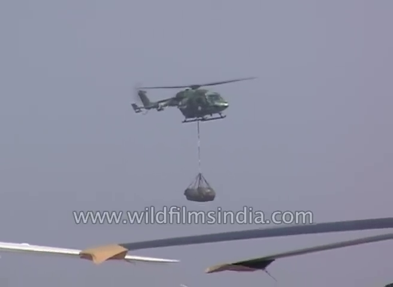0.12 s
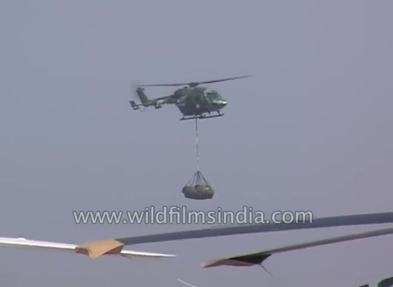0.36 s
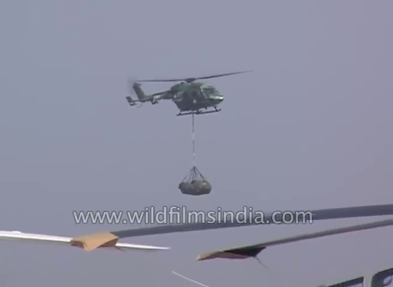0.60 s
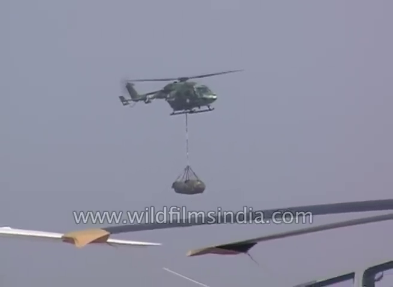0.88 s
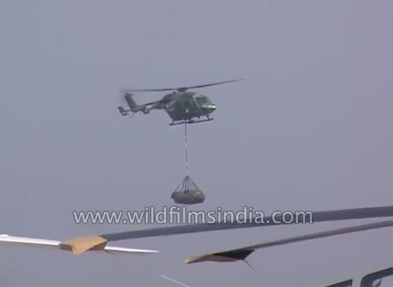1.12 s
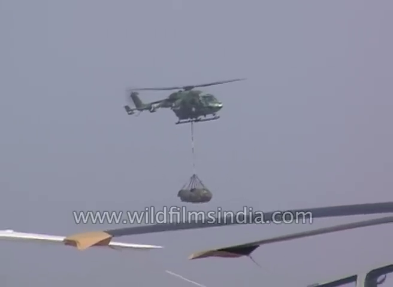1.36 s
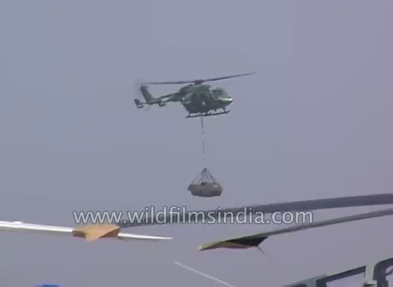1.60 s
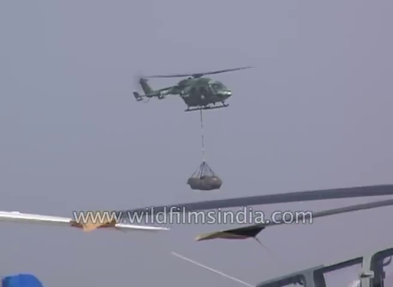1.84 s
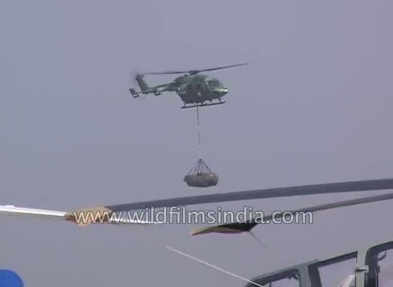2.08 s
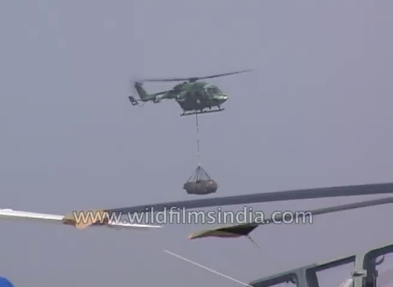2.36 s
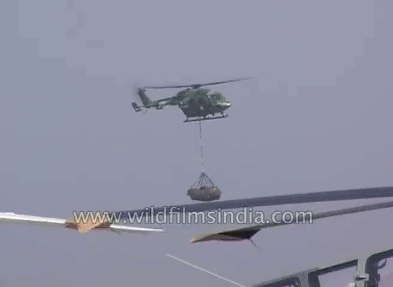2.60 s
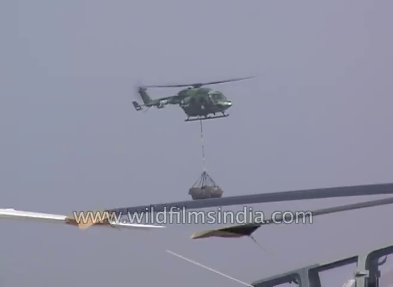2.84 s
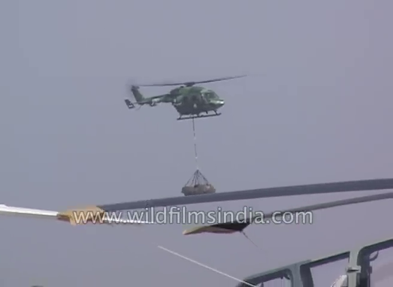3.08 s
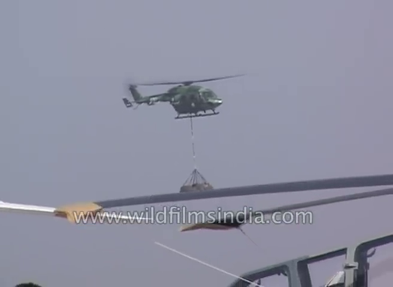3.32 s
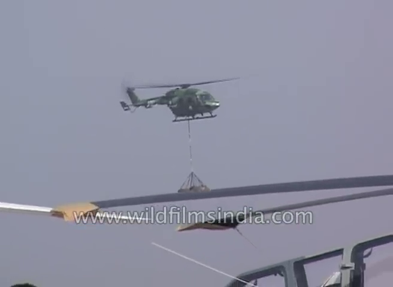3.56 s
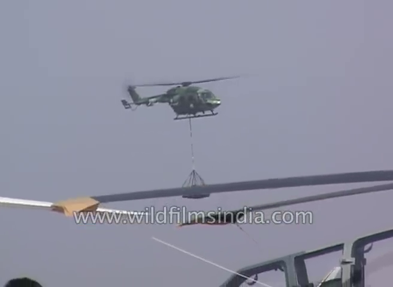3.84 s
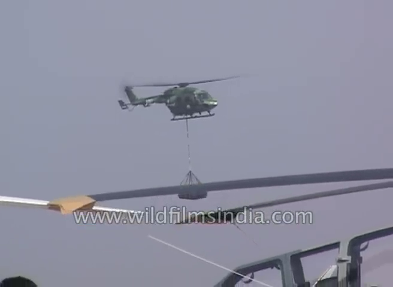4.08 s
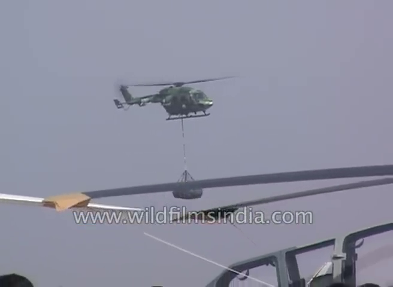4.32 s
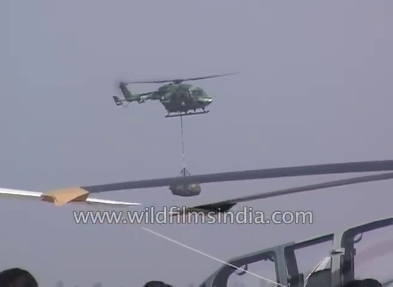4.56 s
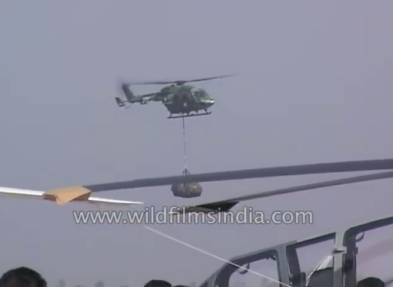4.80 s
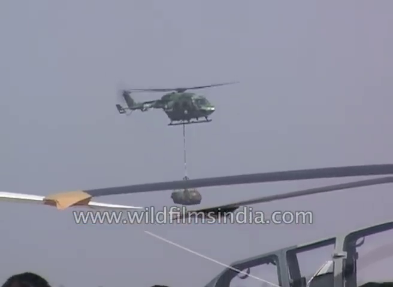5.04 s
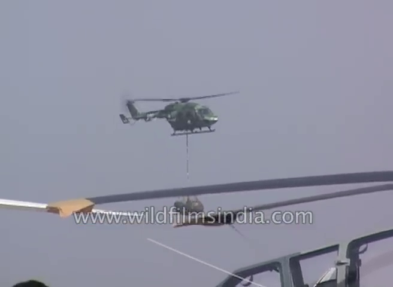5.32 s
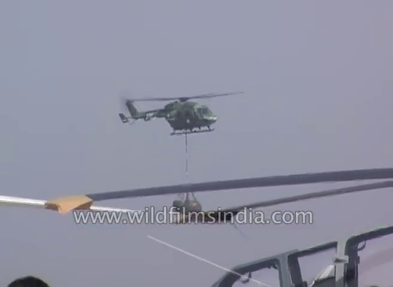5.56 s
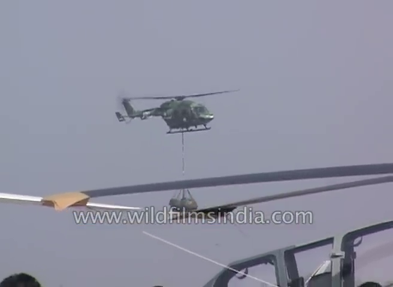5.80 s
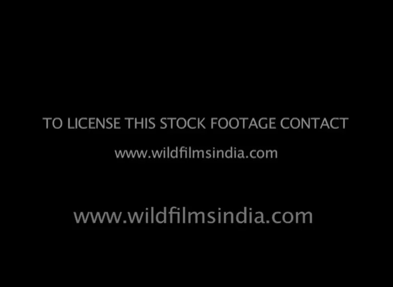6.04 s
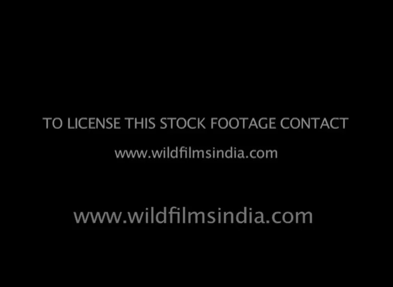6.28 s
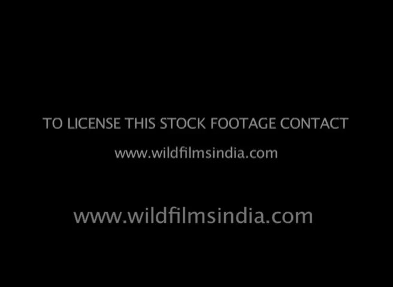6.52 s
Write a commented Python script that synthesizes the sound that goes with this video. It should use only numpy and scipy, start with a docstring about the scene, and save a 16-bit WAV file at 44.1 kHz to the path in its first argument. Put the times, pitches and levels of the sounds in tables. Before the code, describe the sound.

A helicopter hovers outdoors at some distance. Its blades slap about twenty-one times a second, a fast low flutter with small dry cracks, over rumbling wash, airy swish and a steady tail-rotor hum. Slaps are strongest from one to two and a half seconds, then blur and soften. A thin turbine whine and camcorder hiss sit behind. Everything fades to silence by six seconds.

```python
"""A helicopter's four-blade rotor slaps about 21 times a second: each pass is a thud or puff with a crack.
Shaped noise makes rotor wash, blade swish and exhaust hiss; wavering harmonics make the tail rotor hum.
A narrow fluttering band is the turbine whine. The tape camcorder adds hiss, a picture-line whistle and
the buzz of its drum. All of it fades to silence near the end."""
import sys
import numpy as np
from scipy import signal
from scipy.fft import rfft, irfft
from scipy.io import wavfile
from scipy.ndimage import uniform_filter1d

SR = 44100
rng = np.random.default_rng(int(sys.argv[2]) if len(sys.argv) > 2 else 0)


def store_wav(level_fs):
    """Save 16-bit WAV to argv[1]."""
    pcm = np.round(np.clip(np.atleast_2d(level_fs), -1, 1) * 32767)
    wavfile.write(sys.argv[1], SR, pcm.T.astype(np.int16))


def level_to_linear(level):
    """Convert decibel levels to linear amplitude factors, elementwise."""
    exponent = np.asarray(level, float) / 20
    return 10 ** exponent


N = 293706
BLADE_HZ, TAIL_HZ = 20.95, 102.97


def evened(x):
    """Scales to rms 1."""
    return x / np.sqrt(np.mean(x ** 2) + 1e-20)


def read_spectrum(points, hz):
    """Reads a spectrum table on a log-frequency axis."""
    point_hz, db = np.transpose(points)
    return np.interp(np.log(hz + 1), np.log(point_hz + 1), db)


def curves(rows, t):
    """Returns the columns of a time table at times t."""
    row_s, *columns = np.transpose(rows)
    return [np.interp(t, row_s, column) for column in columns]


def drift(hz, size):
    """Slow chance up to about hz, rms about 1; one row for each of size."""
    coarse = N // 64 + 1
    z = rfft(rng.standard_normal((size, coarse)))
    z *= np.exp(-(np.fft.rfftfreq(coarse, 64 / SR) / hz) ** 2)
    slow = irfft(z, coarse)
    slow = slow / slow.std(1, keepdims=True)
    steps = np.repeat(slow, 64, 1)[:, :N]
    return uniform_filter1d(steps, size=64)


def gusty(spectrum, patchy_db):
    """Rms-1 noise whose spectrum flickers in patches, as air eddies cross the sound path."""
    frames, hz = N // 256 + 5, np.fft.rfftfreq(1024, 1 / SR)
    real, imag, patches = rng.standard_normal((frames, 513, 3)).T
    patches = uniform_filter1d(patches, size=8, axis=0)
    patches = evened(uniform_filter1d(patches, size=20, axis=1))
    level_db = read_spectrum(spectrum, hz)[:, None] + patchy_db * patches
    z = (real + 1j * imag) * level_to_linear(level_db)
    return evened(signal.istft(z, nperseg=1024, noverlap=768)[1][:N])


def gate(s, ms):
    """Bell-shaped gate around time 0."""
    return np.exp(-(1000 * s / ms) ** 2 / 4)


def unit_pass(passes):
    """Scales each blade pass to mean power 1 over one blade period."""
    return passes / np.sqrt((passes ** 2).sum(1, keepdims=True) * BLADE_HZ / SR)


def thud(u, lag_s, hz, turn):
    """Short wave packet plus a low boom that lingers; deeper thuds boom more."""
    cycles, locked_hz, turn_spread_rad = 0.71, 243, .3
    boom_ms, boom_hz = 3.8, 238.0
    boom_db = np.minimum(-9 - 0.21 * (hz - 300), 0)
    # the wave keeps step with the rotor
    phase = 2 * np.pi * locked_hz * lag_s - .6 + turn_spread_rad * turn
    packet = np.exp(-(u * hz / cycles) ** 2) * np.cos(2 * np.pi * hz * u + phase)
    after = np.maximum(1000 * u / boom_ms, 0)
    swell = np.e * after * np.exp(-after)
    boom = level_to_linear(boom_db) * swell * np.cos(2 * np.pi * boom_hz * u + phase)
    return unit_pass(packet + boom)


# Low noise of the rotor's air, relative spectrum; airflow() plays it too.
# Each row: frequency in Hz, spectral level in dB per Hz.
WASH_SPECTRUM = [(13, -49), (22, -37.5), (81, -7), (160, -5.5), (221, 3), (296, -15.5), (375, 1), (413, -4),
                 (554, -14.5), (620, -26.5), (810, -44), (1360, -120)]


def puff(u, in_step, smear_ms, hz):
    """Burst of wash noise leaning to the thud's pitch; each blade finds air like the last one did."""
    alike, width_hz, lift_db = 0.91, 76, 6
    fresh = gusty(WASH_SPECTRUM, patchy_db=0)[:len(u) * 2048].reshape(-1, 2048)
    eddies = signal.lfilter([1], [1, -alike], fresh, axis=0)
    burst = gate(u, smear_ms) * np.take_along_axis(eddies, (in_step + 1024) % 2048, 1)
    off_pitch = (np.fft.rfftfreq(4096, 1 / SR) - hz) / width_hz
    lift = level_to_linear(lift_db * np.exp(-off_pitch ** 2))
    return unit_pass(irfft(rfft(burst) * lift))


# Blade swish, relative spectrum with dips from the ground echo; airflow() plays it too.
# Each row: frequency in Hz, spectral level in dB per Hz.
SWISH_SPECTRUM = [(330, -19), (560, -7), (676, 7), (763, -6), (833, 4.5), (947, -7), (1030, -1),
                  (1260, -0.5), (1400, -5.5), (1680, -5.5), (2240, -15.5), (2580, -29), (2800, -39),
                  (3640, -71), (6160, -120)]
# Treble bite of the crack, relative spectrum. Each row: frequency in Hz, spectral level in dB per Hz.
BITE_SPECTRUM = [(2000, -30), (2500, 7), (3200, 2), (3900, -6), (4600, -5.5), (5400, -25.5), (7000, -52.5)]


def crack(u, index, smear_ms, keen):
    """Gated swish and treble noise broken into snaps; it leads the thud and dulls as the slap smears."""
    lead_ms, rise_share, ragged_db, bite_uneven_db = 1.3, .4, 2.5, 3.5
    v = u + lead_ms / 1000
    snaps = gate(v, smear_ms * np.where(v < 0, rise_share, 1))  # quick to rise, slower to fall
    ragged = np.take(drift(150, size=1)[0], index, mode="wrap")
    snaps = snaps * level_to_linear(ragged_db * ragged)
    swish = unit_pass(snaps * np.take(gusty(SWISH_SPECTRUM, 0), index, mode="wrap"))
    bite = unit_pass(snaps * np.take(gusty(BITE_SPECTRUM, 0), index, mode="wrap"))
    bite_db = -17 - 2 * smear_ms + bite_uneven_db * keen
    return swish + level_to_linear(bite_db) * bite


# Mean blade slap over time, before spread from blade to blade.
# Each row: time in seconds, lag behind the steady beat in ms, thud level in dB, smear in ms,
# thud pitch in Hz, crack against the thud in dB.
SLAPS = [(0.1, 2.5, -30.5, 5.04, 346, -18.5), (0.33, 1.5, -40, 4.4, 330, -9.5),
         (0.55, 0.5, -32, 2.6, 287, -12.5), (0.9, 1.5, -31.5, 2.54, 293, -17),
         (1.1, 2, -25.5, 1.88, 321, -21.5), (1.22, 2, -26.5, 3.2, 332, -16),
         (1.34, 2.5, -32, 2.66, 364, -17.5), (1.45, 2.5, -26, 2.75, 273, -18),
         (1.72, 2, -24, 3.1, 264, -24), (1.86, 0.5, -29, 3.6, 389, -8), (2.05, -0.4, -29, 4.3, 310, -8.5),
         (2.2, -3, -26, 2.64, 254, -16), (2.3, 2, -26, 4, 266, -13), (2.5, 1.5, -30.5, 5.5, 344, -11),
         (2.62, -5, -33.5, 7, 290, -15), (2.95, -3.5, -32.5, 4.7, 280, -16.5),
         (3.2, -5.5, -34, 5.8, 264, -10), (3.4, -7, -37.5, 7.9, 344, -14.5), (3.7, 4, -38.5, 6.2, 276, -9),
         (4.1, -4, -36.5, 4.5, 280, -10), (4.35, 0.5, -33.5, 3.8, 327, -8), (4.52, 2, -32, 1.9, 298, -13.5),
         (4.75, -.5, -35, 5.7, 300, -16), (5.05, -0.5, -34.5, 1.6, 321, -16), (5.45, -1.5, -36, 4, 308, -9),
         (5.9, 1, -37, 4.4, 285, -10.5)]


def main_rotor():
    """Each blade meets the vortex of the one before: a thud or a smeared puff, and a crack."""
    jitter_ms, thud_uneven_db, crack_uneven_db = .45, 1.0, 1
    sharp_ms, low_cut_hz = 4.0, 131
    beats = np.arange(int(6.2 * BLADE_HZ)) / BLADE_HZ
    lag_ms, thud_db, smear_ms, hz, crack_db = (c[:, None] for c in curves(SLAPS, beats))
    beats = beats[:, None]
    late, loud, bright, turn, keen = rng.standard_normal((len(beats), 5)).T[:, :, None]

    at = beats + (lag_ms + jitter_ms * late) / 1000
    index = np.round(at * SR).astype(int) + np.arange(-2048, 2048)
    u = index / SR - at  # seconds from the slap
    in_step = index - np.round(beats * SR).astype(int)

    # a sharp meeting repeats its shape, a smeared one is noise
    clean = 1 / (1 + (smear_ms / sharp_ms) ** 4)
    low = np.sqrt(clean) * thud(u, at - beats, hz, turn)
    low = low + np.sqrt(1 - clean) * puff(u, in_step, smear_ms, hz)
    high = crack(u, index, smear_ms, keen)
    passes = level_to_linear(thud_db + thud_uneven_db * loud) * low
    passes = passes + level_to_linear(thud_db + crack_db + crack_uneven_db * bright) * high

    slaps = np.bincount(index.ravel() + 4096, passes.ravel(), N + 8192)[4096:N + 4096]
    return signal.sosfilt(signal.butter(2, low_cut_hz, "high", fs=SR, output="sos"), slaps)


# Exhaust hiss, relative spectrum. Each row: frequency in Hz, spectral level in dB per Hz.
EXHAUST_SPECTRUM = [(2000, -26.5), (2500, 8.5), (2800, -2), (3100, 1.5), (3600, -1), (3950, -6),
                    (4600, 0.5), (5000, -9.5), (5600, -19.5), (6000, -11), (6500, -25), (7500, -32.5),
                    (9000, -74)]
# How well the moving air carries the steady noise, before each noise's share.
# Each row: time in seconds, gain in dB.
CARRY = [(0, 0.5), (.35, 1.5), (.7, 2.1), (1.1, 0.5), (1.5, 2), (1.7, 3.5), (2.05, 5.5), (2.45, 4),
         (2.8, 0.5), (3.2, .5), (3.5, -1), (3.78, 1.5), (4.1, 0.5), (4.4, 2), (4.9, -0.5), (5.45, 6),
         (5.9, -1)]


def airflow():
    """Rotor wash, blade swish and exhaust hiss; tail blades chop the last two, main blades the hiss."""
    throb_db, tail_chop_db = 0.4, 1.5
    t = np.arange(N) / SR
    carry_db, = curves(CARRY, t)
    wash_gust, swish_gust, hiss_gust = drift(4.4, size=3)
    # level in dB, share of the carry, random gusts in dB
    wash_db = -37.3 + .5 * carry_db + .8 * wash_gust
    swish_db = -46 + 1.49 * carry_db + 0.51 * swish_gust
    hiss_db = -62.5 + 0.49 * carry_db + 1 * hiss_gust

    throb = throb_db * np.cos(2 * np.pi * BLADE_HZ * t) ** 3
    chop_depth_db = tail_chop_db * (1 + 0.32 * drift(2, size=1)[0])
    chop = chop_depth_db * np.cos(2 * np.pi * TAIL_HZ * t + drift(0.78, size=1)[0])

    wash = level_to_linear(wash_db) * gusty(WASH_SPECTRUM, patchy_db=2.0)
    swish = level_to_linear(swish_db + chop) * gusty(SWISH_SPECTRUM, patchy_db=1.9)
    hiss = level_to_linear(hiss_db + throb + chop) * gusty(EXHAUST_SPECTRUM, patchy_db=1.0)
    return wash + swish + hiss


# Tail rotor harmonics. Each row: multiple of the tail blade rate, mean rms level in dB.
TAIL_HARMONICS = [(1, -49.5), (2, -50.5), (3, -48.5), (4, -68), (6, -69.5), (8, -69)]


def tail_rotor():
    """A hum of blade harmonics that waver in level and, together, in pitch."""
    waver_hz, waver_db = 0.304, 0.5
    phase = 2 * np.pi * np.cumsum(TAIL_HZ + waver_hz * drift(1.61, size=1)[0]) / SR
    order, db = np.transpose(TAIL_HARMONICS)[:, :, None]
    level = np.sqrt(2) * level_to_linear(db + waver_db * drift(6, size=len(TAIL_HARMONICS)))
    return (level * np.cos(order * phase)).sum(0)


# Turbine whine pitch. Each row: time in seconds, centre frequency in Hz.
WHINE_PITCH = [(0, 5840), (.9, 5885), (1.8, 5805), (2.6, 5880), (3.4, 5865), (3.8, 5830), (5.3, 5810),
               (6.0, 5690)]
# Turbine whine level before flutter. Each row: time in seconds, level in dB.
WHINE_LEVEL = [(0, -79), (1.2, -74.5), (2.0, -77.5), (3.4, -72.5), (3.7, -83), (4.9, -80), (5.6, -74)]


def turbine():
    """A compressor tone blurred by turbulent air into a narrow fluttering band."""
    blur_hz, flutter_hz, flutter_db = 70, 18, 2.5
    t = np.arange(N) / SR
    (hz,), (db,) = curves(WHINE_PITCH, t), curves(WHINE_LEVEL, t)
    real, imag = drift(blur_hz, size=2)
    db = db + flutter_db * drift(flutter_hz, size=1)[0]
    tone = np.exp(2j * np.pi * np.cumsum(hz) / SR)
    return level_to_linear(db) * ((real + 1j * imag) * tone).real


# Mean rms level of the drum's teeth. Each row: frequency in Hz, level in dB.
DRUM_TEETH = [(2500, -78.5), (5200, -89.5), (7000, -93), (11000, -97), (15500, -99)]


def camcorder():
    """Flat hiss, the picture-line whistle, and a comb from the spinning drum whose teeth swell slowly."""
    hiss_db, scan_hz, scan_db = -73.5, 15625.0, -93.5
    drum_hz, swell_hz, swell_db = 150.0, 0.66, 1.0
    t = np.arange(N) / SR
    hiss = level_to_linear(hiss_db) * rng.standard_normal(N)
    whistle = np.sqrt(2) * level_to_linear(scan_db) * np.sin(2 * np.pi * scan_hz * t)

    teeth_hz = np.arange(14, 105) * drum_hz
    turn_samples = round(SR / drum_hz)
    start = rng.random((len(teeth_hz), 1))
    one_turn = np.cos(2 * np.pi * (teeth_hz[:, None] * t[:turn_samples] + start))
    turns = -(-N // turn_samples)
    swell = swell_db * drift(swell_hz, size=len(teeth_hz))[:, ::turn_samples]
    level = np.sqrt(2) * level_to_linear(read_spectrum(DRUM_TEETH, teeth_hz)[:, None] + swell)
    drum = (level.T[:turns] @ one_turn).ravel()[:N]
    return hiss + whistle + drum


def scene():
    """The helicopter as it reaches the microphone."""
    return (main_rotor() + airflow() + tail_rotor() + turbine())[None]


def band_limit(x):
    """A steep low-pass at the top of the band."""
    return signal.sosfilt(signal.butter(12, 15700, fs=SR, output="sos"), x)


def record(dry):
    """Adds the camcorder's own noise; the fader then slides evenly down to silence."""
    fade_from_s, fade_to_s = 4.87, 6.052
    t = np.arange(N) / SR
    fader = np.clip((fade_to_s - t) / (fade_to_s - fade_from_s), 0, 1)
    mix = (dry + camcorder()) * fader
    return band_limit(mix)


dry = scene()
out = record(dry)
store_wav(out)
```